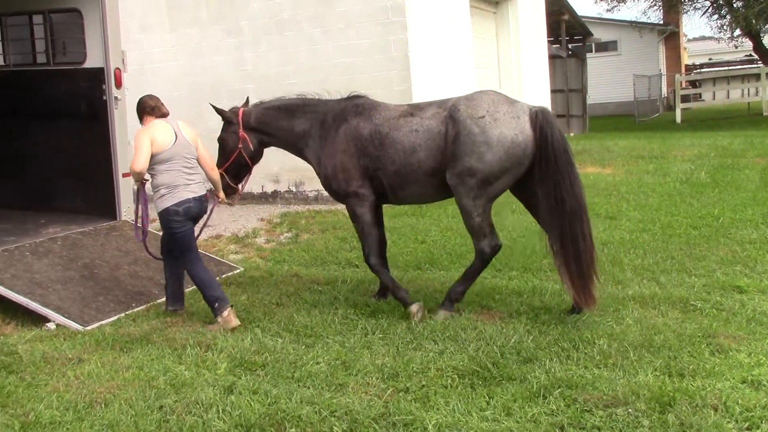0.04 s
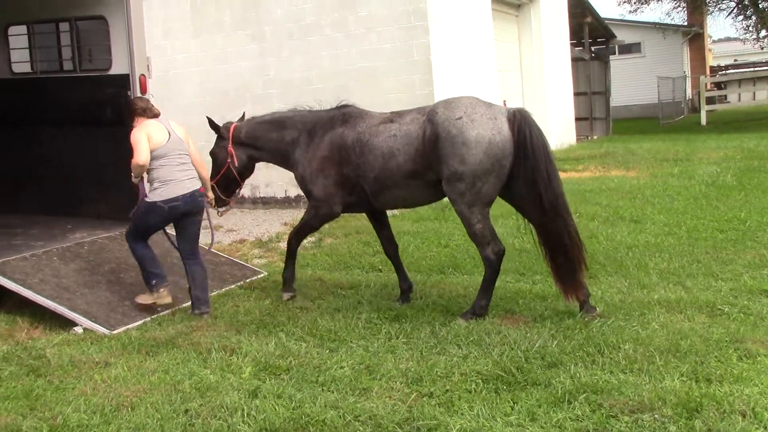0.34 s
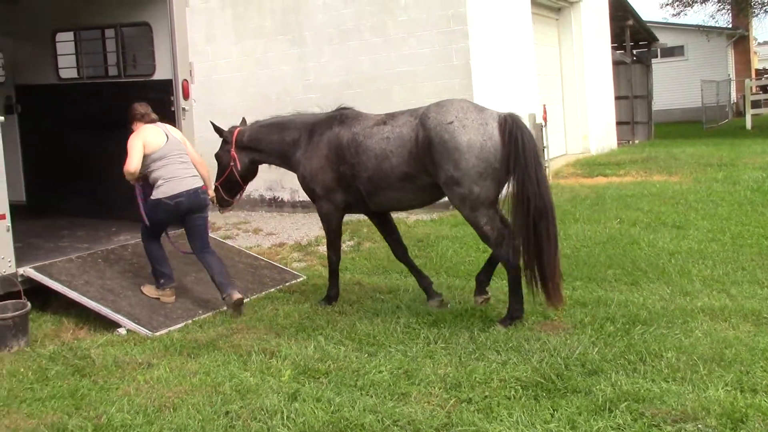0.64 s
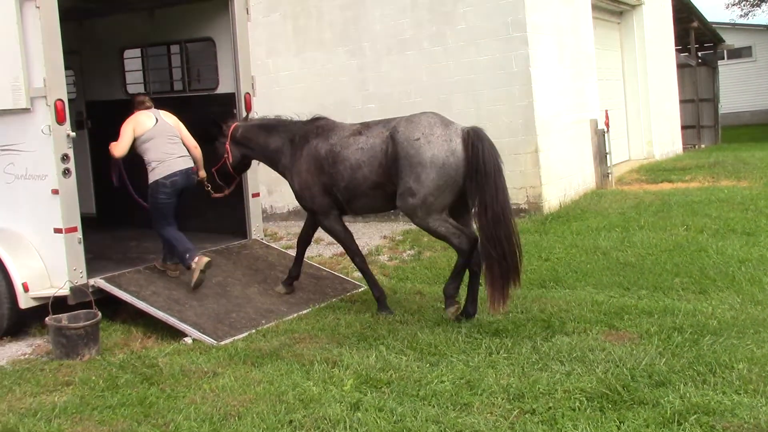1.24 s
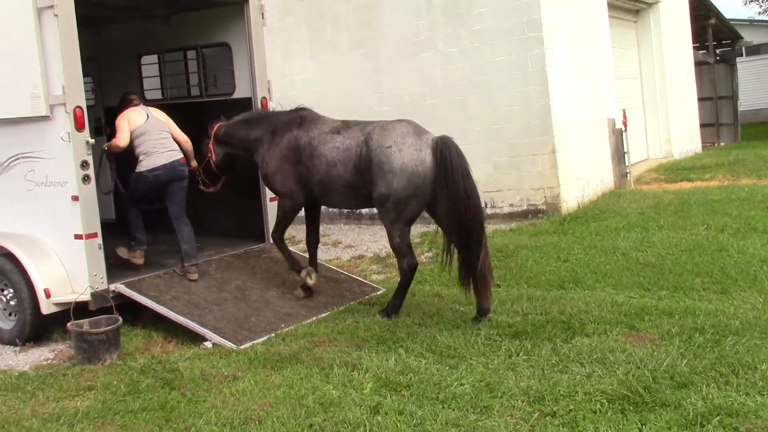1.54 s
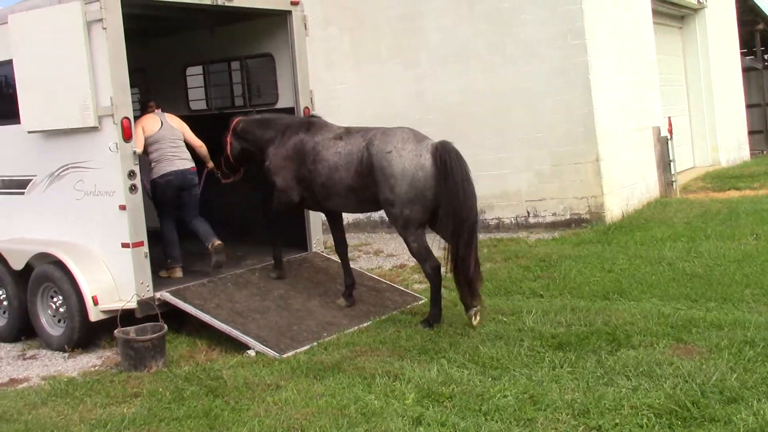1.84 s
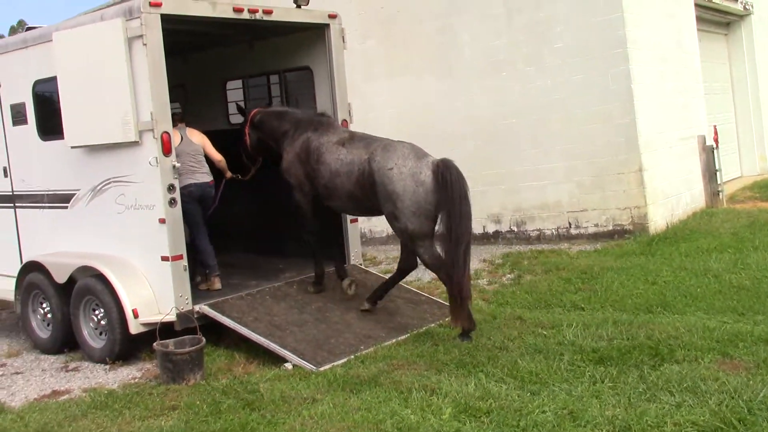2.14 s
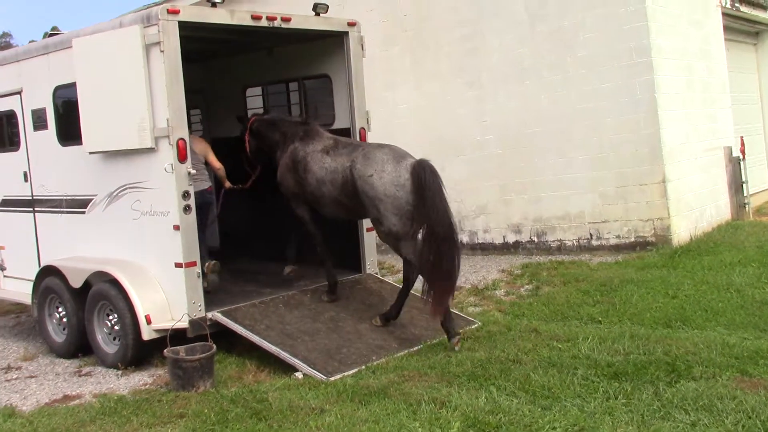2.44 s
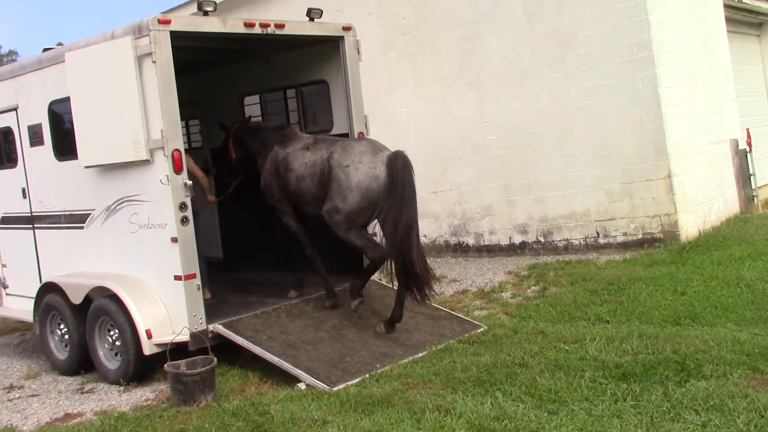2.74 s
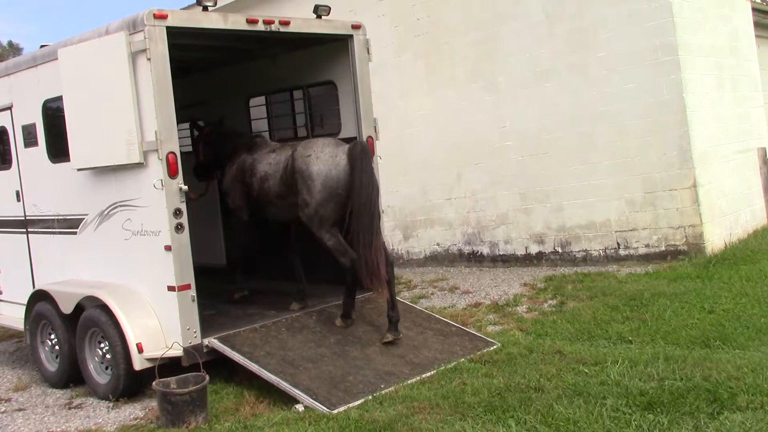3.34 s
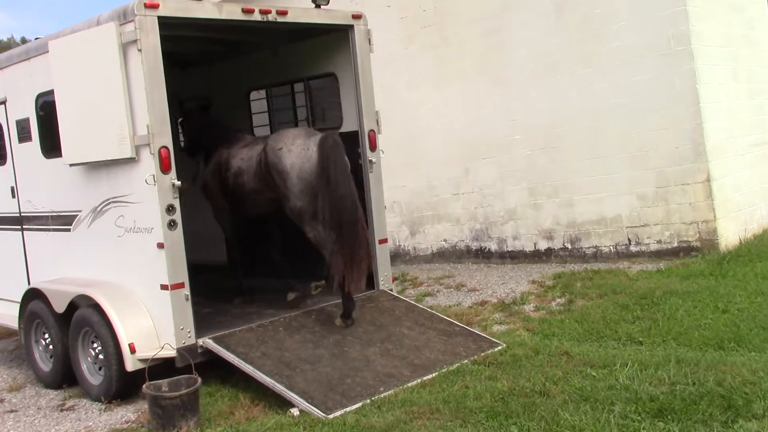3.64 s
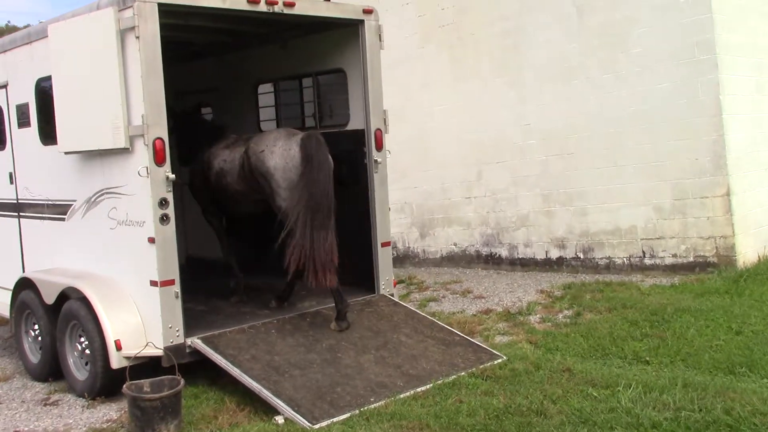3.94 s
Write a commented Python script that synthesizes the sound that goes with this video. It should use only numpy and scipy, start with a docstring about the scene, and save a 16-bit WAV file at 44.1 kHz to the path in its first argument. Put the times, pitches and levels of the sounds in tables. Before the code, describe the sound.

Horse hooves clop unevenly onto a trailer ramp, with gusts of wind growing on the microphone.

```python
"""Horse up a trailer ramp

A horse is led over grass and up the matted ramp of a metal trailer, a few metres away.
Each hoof knocks, thuds, clops and scuffs grit; the frame rings and the hollow trailer answers.
Gusts buffet the microphone more and more, over fading road hiss, a rustle, insects and a far bird."""
import sys
import numpy as np
from scipy import signal
from scipy.fft import rfft, irfft
from scipy.io import wavfile
from scipy.ndimage import uniform_filter1d

SR = 44100
rng = np.random.default_rng(int(sys.argv[2]) if len(sys.argv) > 2 else 0)


def dump(signal):
    """Clip the signal to [-1, 1] and save it as 16-bit WAV at the path in sys.argv[1]."""
    limited = np.clip(np.atleast_2d(signal).T, -1, 1)
    pcm = np.round(limited * 32767).astype(np.int16)
    wavfile.write(sys.argv[1], SR, pcm)


N = 176400
T = np.arange(N) / SR


def steps():
    """Each step drives the ramp with a burst of impacts: deep thud, hollow clop, scrape, then grit."""
    # hooves and boots: t/s, contact/s, thud/dB, clop/dB, scrape/dB, grit/dB
    footfalls = [(1.16, 0.057, -43, -35.5, -34.5, -35), (1.262, 0.013, -51, -41, -36.5, -39),
                 (1.393, 0.0061, -63, -55, -46, -54.5), (1.483, 0.023, -64, -62, -68, -56),
                 (1.583, 0.025, -43.5, -67, -49.5, -71), (1.685, 0.039, -46.5, -42, -54.5, -65),
                 (1.813, 0.021, -26.5, -34, -38, -39.5), (1.84, .03, -40, -49, -43, -43),
                 (2.191, 0.02, -34, -40.5, -43, -40), (2.249, 0.021, -35, -46, -47.5, -60),
                 (2.483, 0.023, -46.5, -49, -47.5, -59), (2.523, 0.048, -37, -33, -41.5, -59),
                 (2.842, 0.04, -59, -52, -56.5, -75), (2.963, 0.053, -38.5, -44, -46.5, -51.5),
                 (3.06, 0.0095, -34.5, -47.5, -51, -49), (3.404, 0.015, -21.5, -27.5, -31.5, -48.5),
                 (3.428, 0.042, -41, -28.5, -46, -77.5), (3.841, 0.03, -42, -33.5, -44, -74),
                 (3.913, 0.015, -40, -41.5, -72, -71)]
    # EQ of each layer: f/Hz, level/dB
    thud = [(30, -60), (65, -23), (100, 0), (170, 5), (270, 0.5), (400, -13), (700, -31), (2000, -72)]
    clop = [(100, -38), (300, 5), (450, 5), (620, 4.5), (780, 7), (1000, -5), (1200, -1), (1700, -19.5),
            (3000, -52), (9000, -75)]
    scrape = [(200, -16.5), (800, 1), (1400, 4.5), (2200, 3), (2900, -2.5), (3800, -10), (5000, -17.5),
              (9000, -29), (16000, -34)]
    grit = [(800, -30), (3000, 2.5), (4500, 0.5), (6300, -0.5), (7200, 5), (8200, 0.5), (9700, -1.5),
            (11500, -8.5), (15500, -19)]
    layers = [(thud, 0.0047, 0.013), (clop, 0.0047, 0.024), (scrape, 0.0047, 0.016), (grit, 0.011, 0.011)]
    out = np.zeros(N)
    for k, (eq, rise_s, fade_s) in enumerate(layers):
        force = sum(amp(levels[k]) * envelope(s, contact, rise_s, fade_s)
                    for s, contact, *levels in footfalls)
        out += force * steady(colour(grains(), eq), size=600)
    return out


def grains(per_s=4000, spread_db=3.5):
    """Dense tiny impacts of uneven size under a sole."""
    strength = amp(spread_db * np.minimum(rng.exponential(1, N), 4))
    polarity = rng.choice([-1., 1.], N)
    hits = rng.random(N) < per_s / SR
    return steady(strength * polarity * hits, size=500)


def knocks(t60_s=0.02, click_db=0.5):
    """A hoof lands, slaps flat and settles: clicks with woody notes, pitched by where the ramp is hit."""
    # hard hits: t/s, level/dB, f/Hz
    hits = [(1.1606, -18, 530), (1.18, -33, 616), (1.2025, -18.5, 575), (1.228, -33, 484),
            (1.269, -37, 650), (1.59, -39, 680), (1.69, -26.5, 625), (1.71, -34, 727.5), (1.814, -26, 654),
            (2.197, -48, 714), (2.247, -23.5, 568), (2.487, -35, 790), (2.526, -31, 667), (2.549, -17, 730),
            (2.963, -34, 514), (3.069, -23.5, 330), (3.41, -11.5, 440), (3.829, -17.5, 772),
            (3.849, -18, 628), (3.918, -17, 606)]
    # EQ of the attack: f/Hz, level/dB
    click_eq = [(100, -28), (350, 1), (540, -23), (760, 27), (1100, -2), (2000, -18.5), (4000, -17.5),
                (9000, -46)]
    attacks, notes, t = np.zeros(N), np.zeros(N), T[:SR // 10]
    for s, db, hz in hits:
        at = round(s * SR)
        attacks[at] = amp(db + click_db)
        note = amp(db - 60 * t / t60_s) * np.sin(2 * np.pi * hz * t)
        notes[at:at + len(t)] += note[:N - at]
    return notes + colour(attacks, click_eq)


def frame(blows, mix_db=-19.5):
    """The ramp's metal frame rings after each blow."""
    # modes of ramp and frame: f/Hz, relative level/dB, t60/s
    modes = [(240.8, 8.5, 0.67), (355, 2.5, 0.52), (493, -7, 0.18), (606, -6, .3), (796, -3.5, 0.24),
             (957, -11, 0.32), (1181, 10, 0.38), (1600, 3, .2), (1950, -4, 0.38), (2130, 11, 0.27),
             (2360, -5, .3), (3030, 9, .35), (3855, 13, 0.45), (5200, 17, .3), (7100, 0, .15),
             (7125, 10, .15)]
    t = T[:SR // 2]
    ring = sum(amp(db - 60 * t / t60) * np.sin(2 * np.pi * hz * t) for hz, db, t60 in modes)
    return amp(mix_db) * np.std(blows) * unit(signal.fftconvolve(blows, ring)[:N])


def trailer(blows, wet_db=-10, build_s=0.041):
    """The hollow box reverberates, each band dying at its own speed."""
    # reverb time: f/Hz, t60/s
    decay = [(100, 1), (400, 0.45), (900, 0.43), (2000, 0.48), (4000, 0.47), (8000, 0.24), (16000, 0.32)]
    # stereo width: f/Hz, side minus mid/dB
    width = [(100, -48), (500, -58), (1200, -76), (6000, -44), (12000, -9)]
    hz, t, bands = signal.stft(rng.standard_normal((2, SR)), SR, nperseg=256)
    bands = bands * amp(-60 * t / read(decay, hz)[:, None])
    tail = signal.istft(bands, SR, nperseg=256)[1][:, :SR]
    tail *= np.minimum(T[:SR] / build_s, 1)
    mid, side = signal.fftconvolve(blows[None], tail / np.linalg.norm(tail[0]), axes=1)[:, :N]
    return amp(wet_db) * stereo(mid, side, width)


def clicks():
    """Single sharp ticks of tack and gravel."""
    # ticks: t/s, level/dB
    ticks = [(1.168, -14), (1.182, -15), (1.202, -14), (1.505, -33.5), (1.557, -31), (1.849, -10),
             (2.473, -28), (3.274, -33), (3.424, -15)]
    # their EQ: f/Hz, level/dB
    tick_eq = [(500, -16), (1800, 15.5), (3000, 10), (5000, 5), (7500, 3), (11000, 0), (16000, -6)]
    impulses = np.zeros(N)
    for s, db in ticks:
        impulses[round(s * SR)] = amp(db)
    return colour(impulses, tick_eq)


def wind(rise_s=0.0029, fade_s=0.002245, eddy_s=0.0041, buffet_hz=250, slap_db=-14):
    """Eddies thump the two microphone ports at each gust's own pitch, alike in the bass, wider above."""
    # gusts: t/s, length/s, level/dB, brightness/dB, f/Hz
    gusts = [(0.092, 0.033, -37, 5, 246.8), (0.177, 0.0074, -28.5, -7, 291),
             (0.203, 0.036, -38.5, 10, 243.5), (0.388, 0.041, -33.5, 4, 216.6),
             (0.438, .11, -40.5, -18, 209.8), (.896, 0.01, -39, -18, 237.8), (0.955, .014, -37, -26, 192.7),
             (1.607, 0.051, -39.5, 8, 233.5), (1.897, .16, -39, 7.5, 189.3),
             (1.944, 0.017, -28, -17, 253.8), (1.974, 0.0097, -26, 12, 263.2),
             (1.994, .017, -24.5, -17, 260.5), (2.036, 0.027, -28.5, -6, 285.5),
             (2.099, 0.0079, -38.5, 1, 289.8), (2.228, .17, -34, 8.5, 220.4),
             (2.315, 0.015, -19.5, 1.5, 235), (2.719, 0.065, -45.5, -6, 217.1),
             (2.919, 0.012, -35.5, -7, 240), (3.03, 0.037, -36, -1, 249.3), (3.084, .019, -25.5, -6, 264.2),
             (3.101, 0.026, -42.5, -3, 240.7), (3.206, 0.021, -40.5, -5, 250.4),
             (3.264, 0.013, -36.5, -10, 240.1), (3.296, 0.3, -26, -7, 244.4),
             (3.356, 0.043, -27.5, 0.5, 245.6), (3.592, 0.028, -19, -15, 255),
             (3.629, 0.042, -21.5, -14, 259.7), (3.67, 0.029, -17.5, -2.5, 255.7),
             (3.703, 0.0068, -18, 11, 285), (3.714, 0.073, -35, 2, 238), (3.747, 0.02, -22.5, -8, 280.2),
             (3.79, .28, -23, 7.5, 260.2), (3.824, .04, -19, 4, 261.1), (3.865, 0.019, -17, 8, 275),
             (3.896, 0.021, -18.5, 11, 287), (3.914, .022, -13, -4, 316.8)]
    # EQ of the low buffet and of the brighter gusts' slap: f/Hz, level/dB
    buffet_eq = [(25, -61), (50, -50), (80, -18.5), (120, -6.5), (180, -1), (250, 0.5), (340, -5),
                 (450, -15.5), (700, -32.5), (1200, -54.5), (3000, -77.5)]
    slap_eq = [(150, -18.5), (350, 6.5), (500, 3.5), (750, -6.5), (1100, -16), (2000, -39.5), (5000, -84)]
    # stereo width: f/Hz, side minus mid/dB
    width = [(50, -30), (110, -41), (200, -20.5), (350, -8), (600, -4), (1500, -5)]
    # the ports grow less alike: t/s, side gain/dB
    spread = [(0, -64), (1.2, -40), (1.65, -9), (2, -1), (2.35, -2), (3, -2.5), (3.45, 4.5), (4, 2)]
    power = np.array([amp(db) * envelope(s, length - fade_s, rise_s, fade_s)
                      for s, length, db, *_ in gusts]) ** 2
    bright_db, pitch_hz = np.transpose(gusts)[3:]
    total = power.sum(0)
    # varispeed moves the buffet's peak to the pitch of the gusts now blowing
    speed = (pitch_hz / buffet_hz @ power + 1e-12) / (total + 1e-12)
    playhead = np.cumsum(speed) % N
    eddies = amp(wobble(eddy_s))  # 1 dB of flutter
    buffet_gain = eddies * np.sqrt(total)
    slap_gain = eddies * np.sqrt(amp(bright_db) ** 2 @ power) * amp(slap_db + 0.67 * wobble(eddy_s))
    mid, side = (buffet_gain * steady(np.interp(playhead, np.arange(N), noise(buffet_eq)), size=400)
                 + slap_gain * steady(noise(slap_eq), size=300) for _ in range(2))
    return low_cut(stereo(mid, side * fader(spread), width), hz=85)


def road():
    """Tyre noise from a far road, with a few narrow tones, swells briefly, then fades."""
    # tyre EQ: f/Hz, level/dB
    tyre_eq = [(60, -32.5), (150, -7), (300, 1.5), (550, -11), (720, -2.5), (850, -6), (1000, -6),
               (1300, -10), (2500, -16), (3500, -14.5), (4700, -18.5), (7000, -20), (10000, -27.5),
               (16000, -42)]
    # fader ride: t/s, level/dB
    ride = [(0, -45.5), (.15, -43), (.45, -42.5), (.75, -45.5), (1.1, -49), (1.5, -55.5), (2, -57),
            (4, -61.5)]
    # narrow tones over the tyre noise: f/Hz, bandwidth/Hz, relative level/dB
    lines = [(543, 18, -19), (841, 66, -8.5), (6520, 94, -23)]
    # stereo width: f/Hz, side minus mid/dB
    width = [(100, -60), (1000, -68), (2500, -18), (5000, -12), (12000, -14)]
    gain = fader(ride) * amp(0.82 * wobble(0.0048))
    tones = sum(amp(db) * whistle(hz, bandwidth) for hz, bandwidth, db in lines)
    tyres = stereo(ground_echo(noise(tyre_eq)), noise(tyre_eq), width)
    return gain * (tyres + tones)


def ground_echo(x, start_s=0.000905, end_s=0.00135, drift_s=0.68, echo_db=-13):
    """The ground reflection lags more as the traffic moves: a phasey, falling comb."""
    delay = end_s + (start_s - end_s) * np.exp(-T / drift_s)
    return unit(x + amp(echo_db) * np.interp(T - delay, T, x))


def rustle():
    """A soft, flickering rustle comes and goes."""
    # EQ: f/Hz, level/dB
    eq = [(500, 11.5), (2000, 2.5), (4500, 3), (7000, 3.5), (9500, -5), (12000, -11), (16000, -10.5)]
    # fader ride: t/s, level/dB
    ride = [(0, -78), (.1, -45), (.2, -78), (.9, -54.5), (1.049, -71), (2.4, -64), (2.531, -56), (2.7, -57),
            (3.021, -53), (3.2, -64), (3.37, -59), (3.53, -49.5), (3.62, -53), (3.7, -48.5), (3.76, -54.5),
            (3.82, -50.5), (4, -54)]
    return fader(ride) * amp(1.9 * wobble(0.025)) * noise(eq)


def swishes():
    """Tail and lead rope brush in soft, airy swells."""
    # strokes: t/s, length/s, level/dB
    strokes = [(1.45, .09, -60), (2.619, 0.61, -62), (3.469, .14, -57)]
    # EQ, all top end: f/Hz, level/dB
    eq = [(2000, -18), (8000, -2), (12000, 1), (14500, -4), (16000, -5)]
    swells = sum(amp(db) * np.sin(np.pi * np.clip((T - s) / length, 0, 1)) for s, length, db in strokes)
    return swells * noise(eq)


def bird(sag_hz_per_s=1700, bandwidth_hz=74):
    """A far bird sings a few high, slightly falling notes."""
    # notes: t/s, length/s, f/Hz, level/dB
    notes = [(0.228, .025, 5570, -52), (0.952, 0.042, 6510, -55), (1.002, 0.037, 6350, -54),
             (1.1, 0.032, 6380, -57), (2.417, 0.042, 3200, -60.5)]
    return sum(amp(db) * envelope(s, length, rise=0.013, fade=0.0097)
               * whistle(hz - sag_hz_per_s * (T - s), bandwidth_hz) for s, length, hz, db in notes)


def insects(uneven_db=0.5):
    """Faint thin chirps repeat loosely in the grass, no two equally strong."""
    # one row an insect: entry t/s, f/Hz, bandwidth/Hz, chirp rate/Hz, chirp length/s, level/dB
    voices = [(.17, 8890, 260, 6.2, .075, -65.5), (1.655, 10330, 220, 2.4, 0.062, -70.5),
              (3.6, 9500, 170, 6.01, 0.046, -67.5)]
    out = np.zeros(N)
    for first, hz, bandwidth, rate, length, db in voices:
        cycles = rate * (T - first) + 0.058 * wobble(0.84)
        age = (cycles % 1) / rate
        chirps = (T > first) * np.sqrt(abs(np.sin(np.pi * np.minimum(age / length, 1))))
        out += amp(db + uneven_db * wobble(0.42)) * chirps * whistle(hz, bandwidth)
    return out


def air(level_db=-56):
    """A quiet, even bed of still outdoor air."""
    # EQ: f/Hz, level/dB
    eq = [(25, -23), (70, 0), (150, 8), (400, 8), (700, -4.5), (1200, 1.5), (2500, -4), (5000, -33),
          (8500, -12), (12000, -19.5), (16000, -50)]
    # stereo width: f/Hz, side minus mid/dB
    width = [(30, -8), (70, -38), (450, -26), (900, -18.5), (2000, -11.5), (5000, 6), (12000, -13)]
    return amp(level_db) * stereo(noise(eq), noise(eq), width)


def amp(db):
    """Decibels to gain."""
    return 10 ** (np.asarray(db) / 20)


def unit(x):
    """Scales to rms 1."""
    return x / np.sqrt(np.mean(x ** 2) + 1e-20)


def fader(points):
    """Gain that rides through points of t/s, level/dB."""
    return amp(np.interp(T, *np.transpose(points)))


def read(points, hz):
    """Reads a table on a log-frequency axis."""
    f, value = np.transpose(points)
    return np.interp(np.log(hz + 1), np.log(f + 1), value)


def colour(x, eq):
    """Minimum-phase EQ of unit energy: the curve sets only the tone."""
    log_gain = np.log(amp(read(eq, abs(np.fft.fftfreq(8192, 1 / SR)))))
    taps = np.fft.ifft(np.exp(np.conj(signal.hilbert(log_gain)))).real[:4096]
    return signal.oaconvolve(x, taps / np.linalg.norm(taps))[:N]


def low_cut(x, hz):
    """High-pass, 18 dB an octave."""
    return signal.sosfilt(signal.butter(3, hz, "highpass", fs=SR, output="sos"), x)


def noise(eq):
    """Noise of rms 1 with this spectrum."""
    return unit(colour(rng.standard_normal(N), eq))


def steady(x, size):
    """Evens out the power over stretches of size samples."""
    return x / np.sqrt(abs(uniform_filter1d(uniform_filter1d(x ** 2, size), size)) + 1e-12)


def wobble(seconds):
    """Smooth random modulation of rms 1 that changes in about this time."""
    hz = np.fft.rfftfreq(N, 1 / SR)
    return unit(irfft(rfft(rng.standard_normal(N)) * np.exp(-(hz * seconds) ** 2), N))


def whistle(hz, bandwidth_hz):
    """A fuzzy narrow tone that follows hz."""
    return np.sqrt(2) * wobble(1 / bandwidth_hz) * np.sin(2 * np.pi * np.cumsum(hz * np.ones(N)) / SR)


def envelope(start, length, rise, fade):
    """Attack, hold, exponential release; times in seconds."""
    out = np.zeros(N)
    span = slice(round(start * SR), round((start + abs(length) + 10 * fade) * SR))
    t = T[span] - start
    out[span] = np.clip(t / rise, 0, 1) * np.exp(-np.maximum(t - length, 0) / fade)
    return out


def stereo(mid, side, width):
    """Left and right from mid and side; width gives the side's gain by frequency."""
    side = irfft(rfft(side) * amp(read(width, np.fft.rfftfreq(N, 1 / SR))), N)
    return np.array([mid + side, mid - side])


def scene():
    """The horse straight ahead, wind on the microphone, the yard all around."""
    hooves = steps() + knocks()
    ramp = hooves + frame(hooves)
    horse = ramp + trailer(ramp) + clicks() + swishes()
    return horse + wind() + road() + rustle() + bird() + insects() + air()


def record(dry, ceiling=0.7, top_hz=15900):
    """Soft overload in the strongest gusts, the microphone's bass cut, then the band limit."""
    squashed = ceiling * np.tanh(dry / ceiling)
    thin = low_cut(squashed, hz=60)
    band_limit = signal.firwin(511, top_hz, window=("kaiser", 9), fs=SR)
    return signal.oaconvolve(thin, band_limit[None], "same")


dry = scene()
out = record(dry)
dump(out)
```